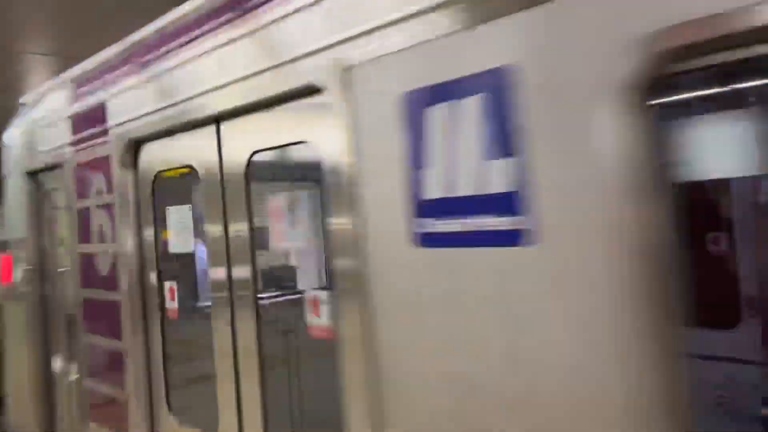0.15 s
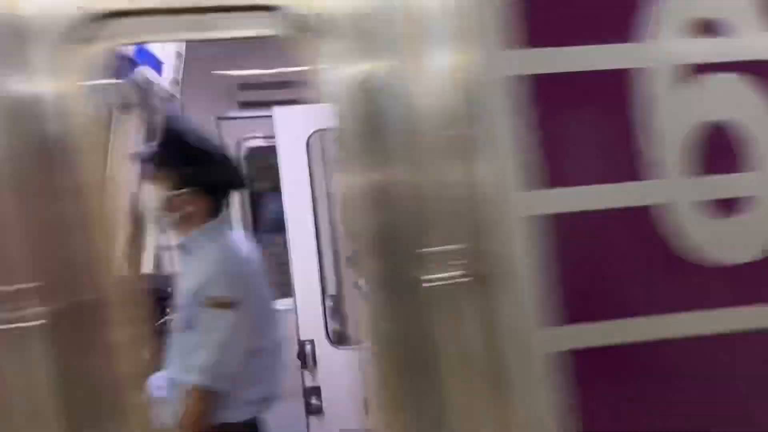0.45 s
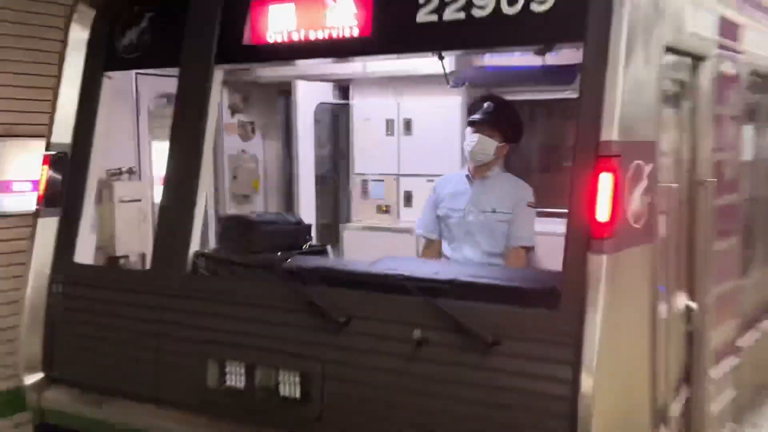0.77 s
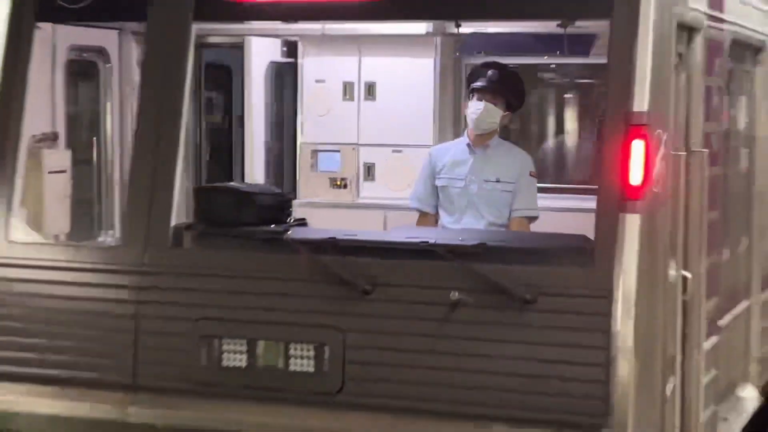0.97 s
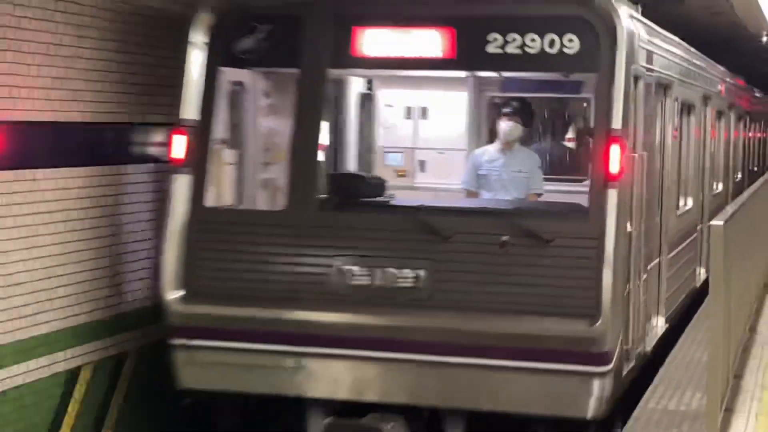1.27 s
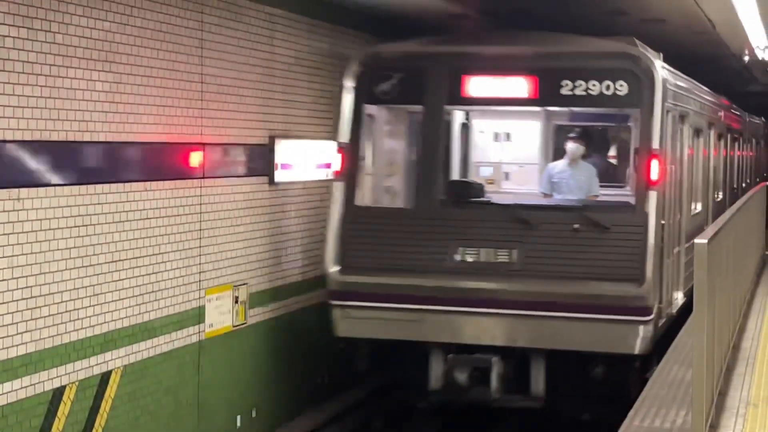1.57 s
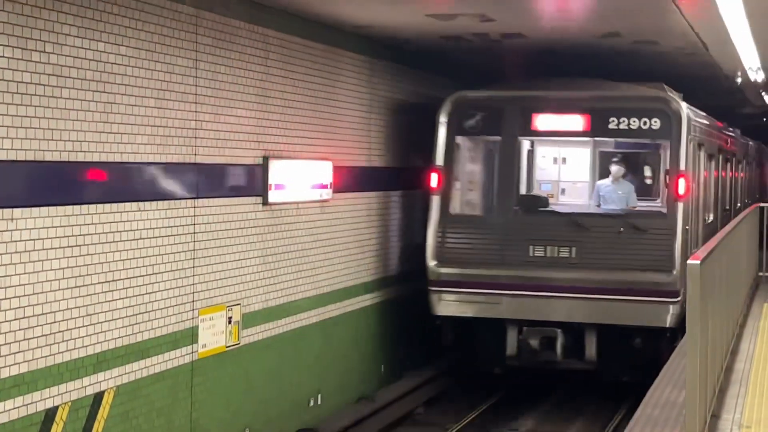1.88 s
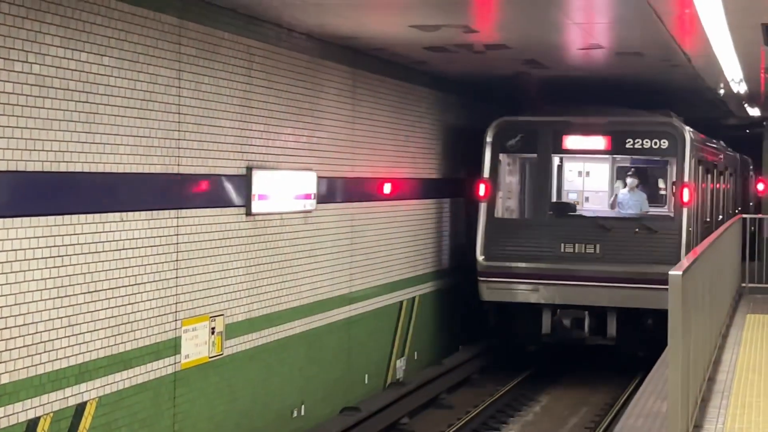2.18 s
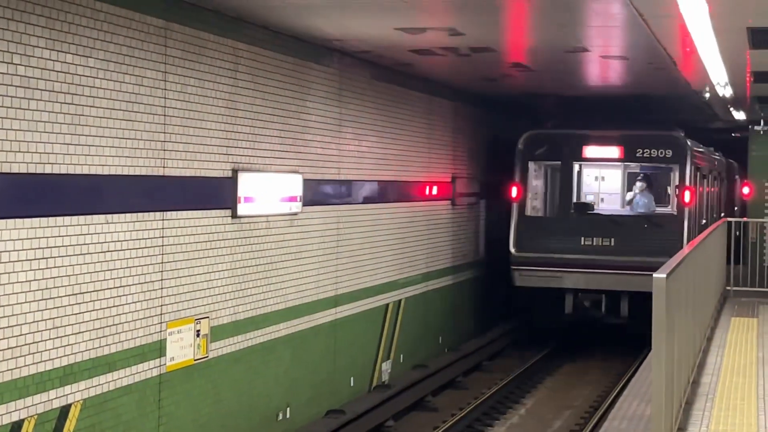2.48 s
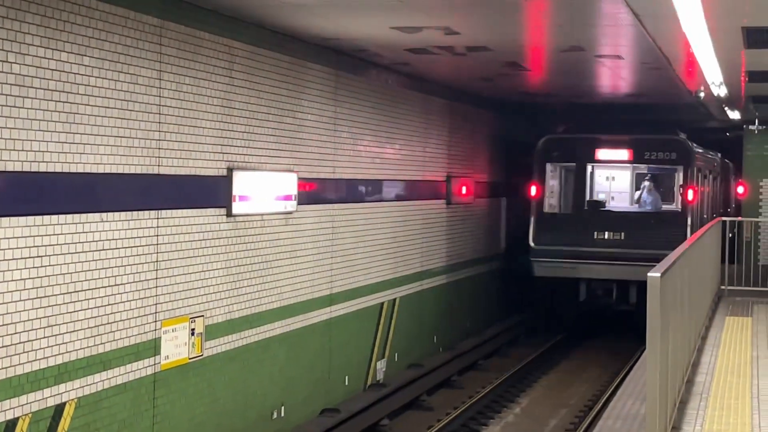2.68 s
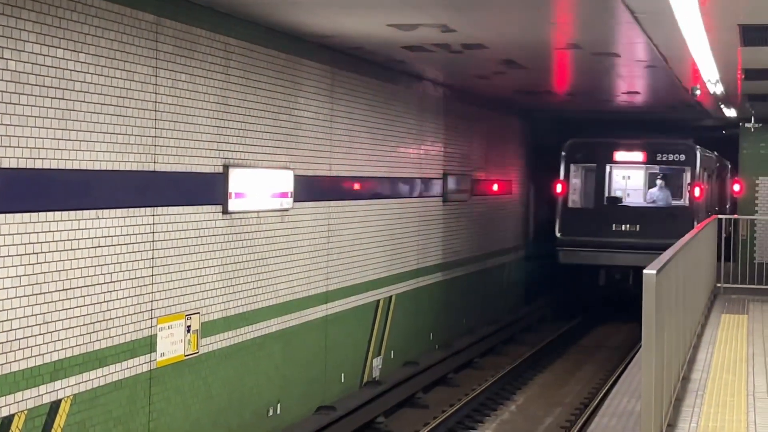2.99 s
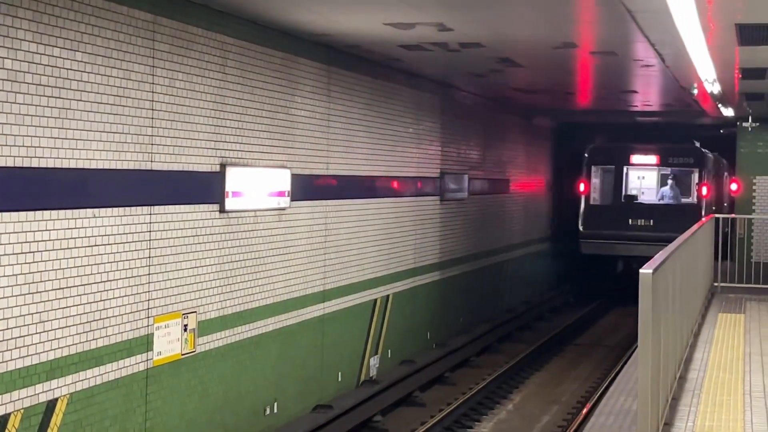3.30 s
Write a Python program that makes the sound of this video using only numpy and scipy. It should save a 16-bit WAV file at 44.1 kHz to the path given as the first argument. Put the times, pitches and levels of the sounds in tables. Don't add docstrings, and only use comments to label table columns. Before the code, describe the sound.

Subway train rumbles and hisses away into a tunnel, draught thumping the microphone near the end

```python
import sys
import numpy as np
from scipy import signal
from scipy.fft import rfft, irfft, next_fast_len
from scipy.io import wavfile
from scipy.ndimage import uniform_filter1d

SR = 44100
rng = np.random.default_rng(int(sys.argv[2]) if len(sys.argv) > 2 else 0)


def to_wav(sig):
    pcm = np.clip(np.atleast_2d(sig), -1, 1) * 32767
    pcm = np.round(pcm).astype(np.int16)
    wavfile.write(sys.argv[1], SR, pcm.T)


def field_ratio(decibels):
    return 10 ** (np.asarray(decibels, dtype=float) / 20)


N = 152145

# time in seconds, level in dB.
NEARNESS = [
    (0.0, -41),
    (0.12, -40),
    (1.24, -40),
    (3.19, -44),
    (3.45, -44.5),
]

# frequency in Hz, density in dB per Hz.
ROAR_FRONT = [(18, -36), (30, -7.5), (103, 1.5), (166, -5), (221, -3), (389, -8.5), (822, -5.5),
              (1130, -17), (1600, -25), (2080, -29), (3520, -120)]
ROAR_SIDE = [(18, -44), (30, -14), (65, -25), (190, -5.5), (370, -8.5), (814, 0.5), (1220, -13.5),
             (1570, -8), (2400, -30), (3120, -33), (5280, -120)]
ROAR_FRONT_DB, ROAR_SIDE_DB = -22.5, -30

# frequency in Hz, slope in dB per dB.
NEARNESS_SLOPE = [(50, 0.9), (150, 0.86), (400, 1.13), (800, 1.43), (1500, 1.6), (3000, 1.2), (8000, 2.06)]

# frequency in Hz, density in dB per Hz.
HISS_FRONT = [(760, -34), (1300, -5), (2200, -3.5), (2510, -4), (4750, -13.5), (5590, -19), (6890, -18.5),
              (7500, -24), (8300, -35.5), (10800, -89), (18300, -120)]
AIR_FRONT = [(5290, -51), (9000, -3.5), (10000, -2), (11500, 0), (13200, -5.5), (13900, -8), (14650, -13)]
HISS_SIDE = [(3120, -47), (5300, -21), (5700, -2.5), (6350, -7), (7910, -0.5), (9880, -12.5), (11000, -21),
             (14300, -52), (22000, -120)]
TOP_SIDE = [(13000, -4), (14000, 0), (15800, -7)]
HISS_FRONT_DB, AIR_FRONT_DB, HISS_SIDE_DB, TOP_SIDE_DB = -36, -58, -51, -69

# time in seconds, added level in dB.
AIR_COURSE = [(0, -1.5), (1.35, -1), (1.45, -1.5), (1.75, -1), (2.6, -2), (3.45, -3)]

# frequency in Hz, density in dB per Hz.
CAR_WALL = [(1700, -12), (2200, -2), (2800, -1), (3300, -3), (4200, -8), (5200, -12), (6200, -17),
            (7200, -40)]
CAR_WALL_DB, TAIL_PASSES_S, TURN_S, TURN_LOSS_DB = -41, 0.72, 0.39, 56

# frequency in Hz, density in dB per Hz.
TAIL_HISS = [(1550, -23), (1700, 3.5), (2100, 3.5), (2350, 1), (2550, -14), (2800, 3), (3400, -11.5)]
# time in seconds, level in dB.
TAIL_HISS_DB = [(0, -58), (.7, -53), (.85, -39.5), (1.5, -36), (2.2, -40), (2.6, -41.5), (3.45, -49)]

# time in seconds, pitch in Hz, level in dB, overtone level in dB.
HUM = [(0, 798, -40, -16), (.6, 785, -47, -21), (.95, 790, -37, -7), (1.1, 781, -32, -22),
       (1.22, 793, -25.5, -18), (1.48, 770, -29.5, -21), (2.02, 774.4, -31, -21), (2.15, 782.5, -27.5, -12),
       (2.35, 790, -25.5, -34), (2.48, 790, -29, -16), (2.6, 771.7, -28, -12), (2.7, 760.8, -27.5, -9.5),
       (2.8, 699, -30.5, -7), (3.0, 704, -31.5, -4.5), (3.1, 712, -31.5, -4.5), (3.2, 749, -26.5, -12),
       (3.45, 785, -31.5, -12.5)]
# multiple of the pitch, level in dB, width in Hz.
HUM_PARTIALS = [
    (1.0, -3, 41),
    (1.94, -9, 64),
    (3.05, -3, 70),
    (3.9, -13, 110),
    (5.1, -18, 79),
]
HUM_SIDE_DB = -16.5

# centre in seconds, frequency in Hz, level in dB.
RAIL_FLARES = [(0.784, 750, -24.5), (0.874, 620, -22), (0.993, 805, -23), (1.016, 740, -21.5),
               (1.065, 736, -26), (1.176, 732.0, -28), (1.184, 653, -21), (1.213, 774, -21.4),
               (1.239, 808, -21.5), (1.289, 717, -17), (1.347, 736, -23), (1.376, 772, -22),
               (1.396, 724.5, -22.2), (1.44, 721.0, -21.5), (1.509, 790, -21), (1.727, 730, -22),
               (1.762, 840, -26), (1.866, 814, -19), (2.113, 791, -21), (2.139, 720, -26),
               (2.209, 800, -20), (2.252, 788, -16), (2.313, 792, -20), (2.389, 785, -27),
               (2.586, 743, -21.9), (2.711, 755, -27), (2.754, 761, -26.5), (3.021, 687, -23)]
OVERTONE_FLARES = [(0.801, 1720, -31), (1.225, 1943.0, -40), (1.312, 2090, -36), (1.344, 2212.0, -39),
                   (1.399, 2255.0, -38), (1.477, 1733.0, -40), (1.622, 2113, -34), (1.637, 1962, -33),
                   (1.678, 1760.0, -33), (1.811, 1950, -36.9), (2.084, 2140, -36), (2.18, 1697, -35),
                   (2.577, 2344, -38.0), (2.807, 2104.0, -35), (2.839, 2152, -34), (2.847, 1353, -33),
                   (2.955, 2140, -37.0), (3.021, 1340, -36), (3.03, 2180.0, -37), (3.068, 2174.0, -35),
                   (3.074, 1410, -36)]
FLARE_HALF_S, FLARE_SIDE_DB = 0.029, -13

# time in seconds, level in dB.
DRAUGHT_DB = [(0, -28.5), (1.9, -35), (2.15, -27), (2.35, -40), (2.55, -25), (2.74, -26), (2.9, -21),
              (3.05, -16.5), (3.2, -24), (3.28, -29), (3.45, -31)]
# frequency in Hz, density in dB per Hz.
WIND = [(15, -44), (25, -51), (49, 6.5), (75, 2), (191, -6.5), (301, -20), (387, -15.5), (600, -25),
        (780, -61), (1320, -120)]
WIND_SIDE_DB = -10.5

# start in seconds, peak in dB, frequency in Hz, ring time in seconds.
BUFFETS = [(2.105, -10, 89, 0.026), (2.168, -10, 60, 0.073), (2.636, -8, 94, 0.027), (2.786, -9, 86, 0.067),
           (2.848, -6.5, 135, 0.034), (2.905, -8.5, 205.5, 0.024), (2.915, -4.5, 77, 0.035),
           (2.94, -9.5, 141, 0.029), (2.9945, 1.5, 140.1, 0.016), (3.006, -7.5, 74, .09),
           (3.058, -12, 250, 0.027), (3.068, -3.5, 93, 0.026), (3.108, -13.5, 241, 0.032),
           (3.115, -14, 90, 0.045), (3.135, -13, 176, 0.049), (3.178, -9, 243, 0.036),
           (3.2, -11.5, 91.6, 0.038), (3.016, -17, 700, 0.027), (3.017, -31, 1200, .015)]

# centre in seconds, frequency in Hz, level in dB.
EDDIES = [(.395, 107, -23), (.679, 208, -25), (.932, 81, -25), (1.936, 102, -22), (2.229, 75.3, -24),
          (2.453, 108, -18.5), (2.534, 217.4, -26), (2.545, 75, -18), (2.569, 356, -26), (2.595, 96.4, -17),
          (2.627, 334, -29), (2.685, 75, -17), (2.691, 304, -25), (2.859, 69.46, -28), (2.949, 70, -20),
          (2.966, 213, -20), (3.001, 378.8, -20), (3.065, 573, -25.5), (3.181, 404.7, -20.5),
          (3.187, 91.8, -14), (3.193, 536.3, -23.5), (3.251, 85.4, -25), (3.271, 369, -27),
          (3.28, 226, -20), (3.315, 108, -23), (3.376, 309.6, -26), (3.408, 70, -35)]
EDDY_HALF_S, EDDY_SIDE_DB = 0.025, -14

# centre in seconds, half length in seconds, frequency in Hz, level in dB, width in Hz.
RESONANCES = [(0.42, 0.35, 109, -23.5, 13), (0.627, 0.73, 287, -27, 56), (1.14, 1, 214, -28, 7.1),
              (0.296, 0.26, 620, -34, 21), (0.44, 0.56, 1330, -36.5, 96), (0.878, 0.18, 680, -31, 12),
              (1.34, 0.31, 710, -34, 25), (1.752, 0.48, 990, -31, 39), (1.763, 0.49, 920, -36, 39.5),
              (2.067, 0.53, 645, -30.5, 20), (.1, 0.11, 1006, -32, 47), (1.845, 0.32, 119, -28.5, 37),
              (2.19, 0.3, 1800, -43, 79), (3.074, 0.52, 340, -29.5, 91), (3.106, 0.063, 480, -31.5, 46)]
RESONANCE_SIDE_DB = -12.5

# low edge in Hz, high edge in Hz, share of front fed to side.
PORT_LEAN = [
    (110, 510, 0.029),
    (920, 2750, -0.26),
    (5800, 6700, 0.07),
]
WIDE_NOTCH_HZ, NARROW_NOTCH_HZ, NOTCH_NARROWS_S = (7650, 9650), (8150, 9000), 1.4

LOW_CUT_HZ, SIDE_LOW_CUT_HZ, END_FADE_S = 31, 100, 0.003
TIME_S = np.arange(N) / SR


def rms_one(x):
    return x / np.sqrt(np.mean(np.abs(x) ** 2) + 1e-20)


def in_time(rows):
    s, *columns = np.transpose(rows)
    return [np.interp(TIME_S, s, column) for column in columns]


def at_hz(points, hz):
    p = np.array(points)
    return np.interp(np.log(hz), np.log(np.maximum(p[:, 0], 1)), p[:, 1])


def drift(rate_hz, step=16):
    r = np.exp(-2 * np.pi * step * rate_hz / SR)
    noise = rng.standard_normal(N // step + 3002)
    slow = signal.lfilter([1], [1, -2 * r, r * r], noise)[3000:]
    return np.interp(np.arange(N) / step, np.arange(len(slow)), rms_one(slow))


def banded(spectrum, near_db, patchy_db):
    size = next_fast_len(N)
    hz = np.maximum(np.arange(size // 2 + 1) * SR / size, 1)
    low_hz, high_hz = spectrum[0][0], spectrum[-1][0]
    inside = (hz >= low_hz) & (hz <= high_hz)
    shaped = rfft(rng.standard_normal(size)) * field_ratio(at_hz(spectrum, hz)) * inside
    shaped = shaped * size / np.sqrt(2 * np.sum(np.abs(shaped) ** 2))
    out, together = 0, drift(8.2)
    for k in range(26, 84, 3):
        centre = 2 ** (k / 6)
        if low_hz / 1.42 < centre < high_hz * 1.42:
            apart = np.abs(6 * np.log2(hz) - k) / 3
            weight = np.cos(np.pi / 2 * np.minimum(apart, 1)) ** 2
            band = irfft(shaped * weight, size)[:N]
            flicker_db = patchy_db * min(1, 3000 / centre) * (0.2 * together + drift(7.7))
            out = out + band * field_ratio(at_hz(NEARNESS_SLOPE, centre) * near_db + flicker_db)
    return out


def rough_tone(hz, width_hz):
    phasor = drift(width_hz, 8) + 1j * drift(width_hz, 8)
    tone = phasor * np.exp(2j * np.pi * np.cumsum(hz) / SR)
    power = uniform_filter1d(np.abs(tone) ** 2, size=1500) / 2
    return (tone / power ** 0.3).real


def tone_bursts(rows, half_s, side_db):
    out = np.zeros((2, N))
    for k, (s, hz, db) in enumerate(rows):
        t = np.arange(max(int((s - half_s) * SR), 0), min(int((s + half_s) * SR), N))
        away = t / SR - s
        burst = field_ratio(db) * np.cos(np.pi / 2 * away / half_s) ** 2
        phase = 2 * np.pi * hz * away
        out[:, t] += [burst * np.sin(phase + k), field_ratio(side_db) * burst * np.sin(phase + k * k)]
    return out


def passing_resonances():
    out = np.zeros((2, N))
    for s, half_s, hz, db, width_hz in RESONANCES:
        away = np.clip((TIME_S - s) / half_s, -1, 1)
        tone = field_ratio(db) * np.cos(np.pi / 2 * away) ** 2 * rough_tone(np.full(N, hz), width_hz)
        out += [tone, field_ratio(RESONANCE_SIDE_DB) * np.roll(tone, 900)]
    return out


def draught():
    gust_db, = in_time(DRAUGHT_DB)
    swell = field_ratio(gust_db + 2.4 * drift(17))
    front = banded(WIND, 0, patchy_db=3.5)
    side = field_ratio(WIND_SIDE_DB) * banded(WIND, 0, patchy_db=8.0)
    return swell * np.array([front, side])


def buffets():
    out = np.zeros((2, N))
    for k, (s, db, hz, ring_s) in enumerate(BUFFETS):
        t = np.maximum(TIME_S - s, 0)
        envelope = np.exp(-3 * t / ring_s) * (1 - np.exp(-t * hz * 4))
        knock = field_ratio(db + 3.5) * np.sin(2 * np.pi * hz * t) * envelope
        out += [knock, (-1) ** k * field_ratio(WIND_SIDE_DB) * np.roll(knock, 60)]
    return out


def eddies():
    return tone_bursts(EDDIES, EDDY_HALF_S, EDDY_SIDE_DB)


def rail_hum():
    hz, level_db, over_db = in_time(HUM)
    front, side = np.zeros((2, N))
    for k, (multiple, db, width_hz) in enumerate(HUM_PARTIALS):
        gain = field_ratio(db + over_db * (k > 0))
        front += gain * rough_tone(multiple * hz, width_hz)
        side += gain * rough_tone(multiple * hz, width_hz)
    return field_ratio(level_db) * np.array([front, field_ratio(HUM_SIDE_DB) * side])


def rail_flares():
    return tone_bursts(RAIL_FLARES + OVERTONE_FLARES, FLARE_HALF_S, FLARE_SIDE_DB)


def rolling():
    level_db, = in_time(NEARNESS)
    near_db = level_db - level_db.mean()
    air_course_db, = in_time(AIR_COURSE)
    tail_db, = in_time(TAIL_HISS_DB)
    front = field_ratio(ROAR_FRONT_DB) * banded(ROAR_FRONT, near_db, patchy_db=0.91)
    front += field_ratio(HISS_FRONT_DB + 0.56 * drift(6.9)) * banded(HISS_FRONT, near_db, patchy_db=0.98)
    front += field_ratio(AIR_FRONT_DB + air_course_db) * banded(AIR_FRONT, near_db, patchy_db=4.5)
    front += field_ratio(tail_db) * banded(TAIL_HISS, 0, patchy_db=1.5)

    turned = np.clip((TIME_S - TAIL_PASSES_S) / TURN_S, 0, 1)
    side = field_ratio(ROAR_SIDE_DB) * banded(ROAR_SIDE, near_db, patchy_db=3.0)
    side += field_ratio(HISS_SIDE_DB) * banded(HISS_SIDE, near_db, patchy_db=2.0)
    side += field_ratio(TOP_SIDE_DB + 1.5 * drift(6.0)) * banded(TOP_SIDE, 0, patchy_db=-7.0)
    side += field_ratio(CAR_WALL_DB - TURN_LOSS_DB * turned) * banded(CAR_WALL, near_db, patchy_db=-1.0)
    return np.array([front, side])


def port_lean(front, side):
    for low_hz, high_hz, share in PORT_LEAN:
        band = signal.butter(2, [low_hz, high_hz], "band", fs=SR, output="sos")
        side = side + share * signal.sosfilt(band, front)
    return side


def port_notch(front):
    hz = np.arange(N // 2 + 1) * SR / N
    spectrum = rfft(front)
    wide, narrow = [irfft(spectrum * ((hz > low) & (hz < high)), N)
                    for low, high in (WIDE_NOTCH_HZ, NARROW_NOTCH_HZ)]
    early = np.clip((NOTCH_NARROWS_S - TIME_S) / 0.026, 0, 1)
    return front - 0.7 * (wide * early + narrow * (1 - early))


def scene():
    front, side = (passing_resonances() + draught() + buffets() + eddies()
                   + rail_hum() + rail_flares() + rolling())
    side = port_lean(front, side)
    front = port_notch(front)
    side_cut = signal.butter(1, SIDE_LOW_CUT_HZ, "high", fs=SR, output="sos")
    side = signal.sosfilt(side_cut, side)
    return np.array([front + side, front - side])


def band_limit(x):
    return signal.sosfilt(signal.butter(12, 15780, fs=SR, output="sos"), x)


def record(dry):
    fade = np.sin(np.pi / 2 * np.clip((N - np.arange(N)) / SR / END_FADE_S, 0, 1)) ** 2
    cut = signal.sosfilt(signal.butter(2, LOW_CUT_HZ, "high", fs=SR, output="sos"), dry)
    mix = 1.56 * np.tanh(fade * cut / 1.648)
    return band_limit(mix)


dry = scene()
out = record(dry)
to_wav(out)
```